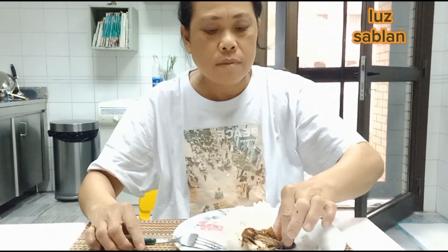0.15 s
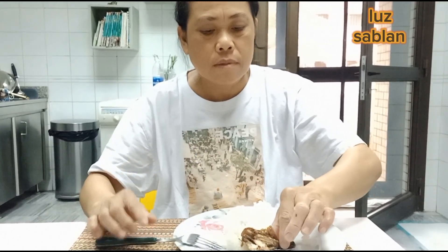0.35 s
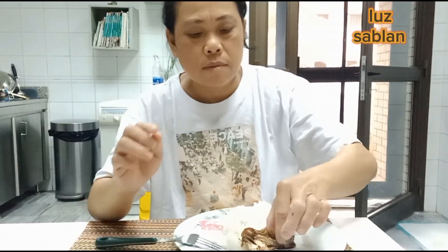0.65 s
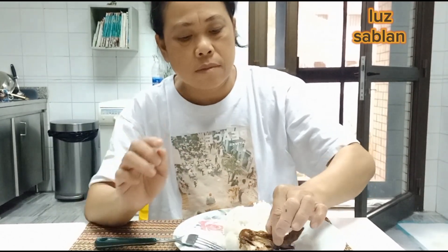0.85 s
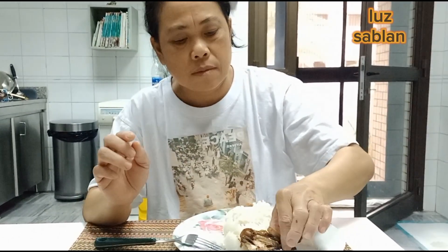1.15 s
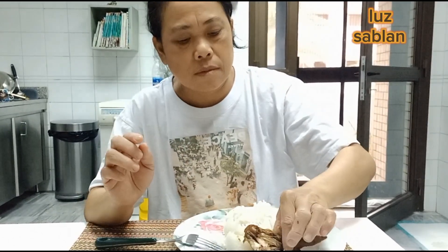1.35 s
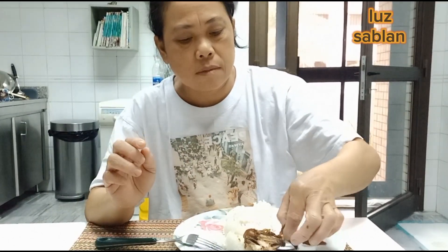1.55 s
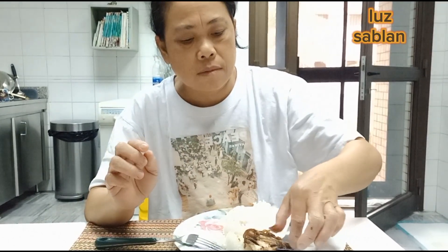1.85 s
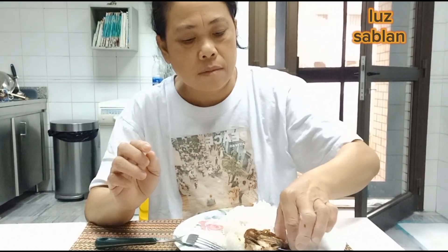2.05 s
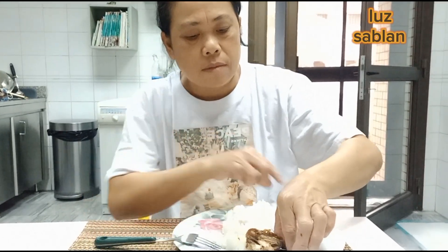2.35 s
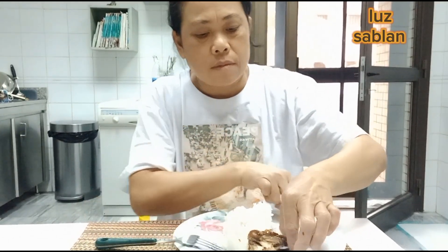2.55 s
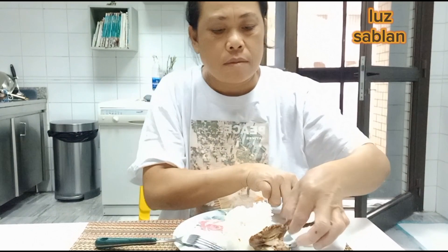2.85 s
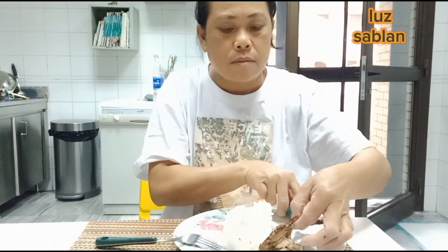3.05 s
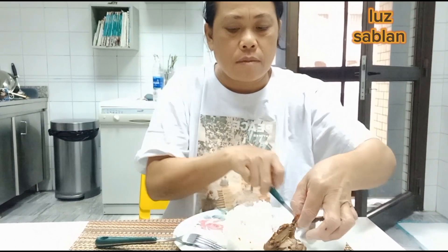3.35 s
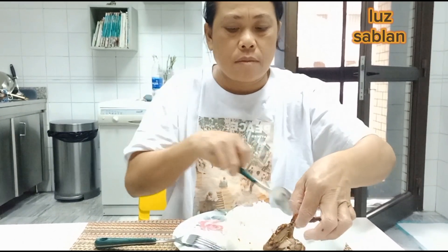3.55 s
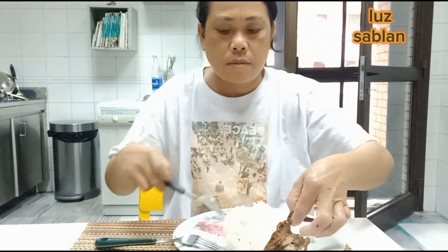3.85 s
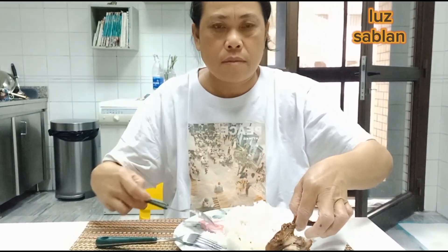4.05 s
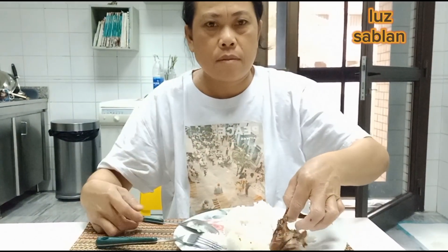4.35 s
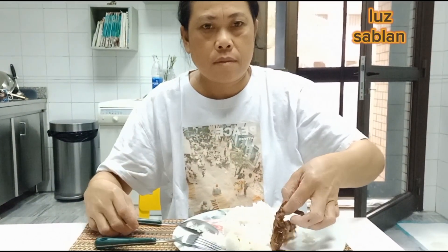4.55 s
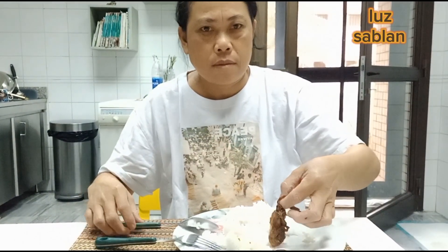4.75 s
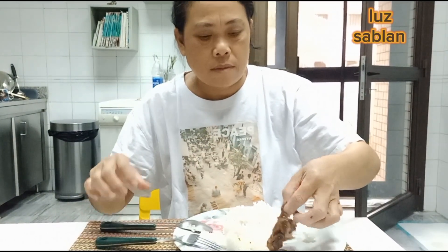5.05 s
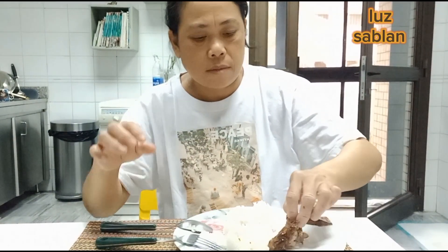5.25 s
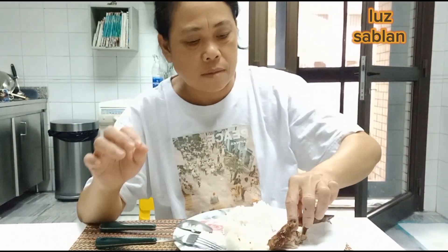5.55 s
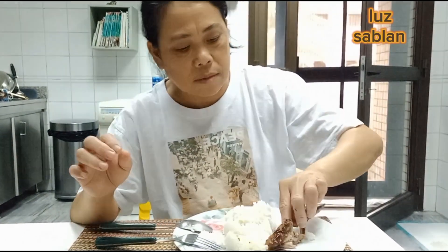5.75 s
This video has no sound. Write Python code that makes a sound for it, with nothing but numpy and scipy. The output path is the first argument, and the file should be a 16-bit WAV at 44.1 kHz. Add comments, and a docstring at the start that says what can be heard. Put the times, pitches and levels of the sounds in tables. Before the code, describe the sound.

Someone cuts food at a table: sparse cutlery clinks, ceramic dings and dull table thuds in a live tiled kitchen.

```python
"""Meal in a tiled kitchen

At the table, a steel knife and fork knock together and rattle, modelled as damped modes plus noise clacks.
Steel taps, scrapes and pings on a ceramic plate; a blade squeaks through meat; the table top thuds.
Fried chicken snaps and crackles in short noise bursts. Hard walls lend each contact a diffuse tail
at two microphones, over the steady rumble of an appliance and a hiss, both shaped noise."""
import sys
import numpy as np
from scipy import signal
from scipy.fft import rfft, irfft, next_fast_len
from scipy.io import wavfile
from scipy.ndimage import uniform_filter1d

SR = 44100
rng = np.random.default_rng(int(sys.argv[2]) if len(sys.argv) > 2 else 0)


def file_out(sig):
    """Save sig as 16-bit WAV at sys.argv[1]."""
    # one column per channel
    cols = np.atleast_2d(sig).T
    # limit, then scale
    lim = np.clip(cols, -1, 1)
    pcm = np.round(lim * 32767).astype(np.int16)
    wavfile.write(sys.argv[1], SR, pcm)


N = 259749  # length of the scene, samples
AGE = np.arange(int(0.75 * SR)) / SR  # time since a contact, s

# knife and fork knock together on the mat and rattle:
# [t/s, knife level/dB, fork level/dB, hardness as cut-off f/Hz, favoured f/Hz of the first contact,
#  favoured f/Hz of the bounces, first flight t/s, loss per bounce/dB]
CLINKS = [(0.001, -46, -53.5, 15000, 1420, 5170, .049, 13),
          (1.070, -44, -28, 11500, 3030, 2370, .0132, 3.5),
          (1.376, -52, -34.5, 7800, 3290, 5050, .022, 7.5), (2.606, -59, -55, 2100, 1600, 1590, .015, 20),
          (4.146, -32.5, -45.5, 17500, 5080, 1330, .0155, 3),
          (4.320, -41.5, -34.5, 14000, 3300, 1536, .02, 9.5),
          (4.760, -43, -51.5, 3820, 2300, 2300, .013, 17), (4.779, -32, -24, 14100, 2930, 2096, .0085, 1.5),
          (4.895, -38, -33, 9400, 1655, 2215, .011, 8.5)]


def amp(db):
    """Decibels to gain."""
    return 10 ** (np.asarray(db) / 20)


def unit(x):
    """Scale x to rms 1."""
    return x / np.sqrt(np.mean(x ** 2) + 1e-30)


def along(points, hz):
    """Read (Hz, value) points by interpolation on a log frequency axis."""
    f, v = np.transpose(points)
    return np.interp(np.log(hz + 1), np.log(f + 1), v)


def filtered(x, response):
    """Multiply the spectrum of x by a gain that depends on frequency."""
    n = x.shape[-1]
    m = next_fast_len(n + 4096)  # zero padding leaves room for the filter to ring out
    return irfft(rfft(x, m) * response(np.fft.rfftfreq(m, 1 / SR)), m)[..., :n]


def noise(spectrum, shape):
    """Noise of rms 1 with a given spectrum."""
    white = rng.standard_normal(shape)
    return unit(filtered(white, lambda hz: amp(along(spectrum, hz))))


def fade(t60, t=AGE):
    """Exponential decay, 60 dB down after t60 seconds."""
    return np.exp(-np.log(1000) * t / np.maximum(t60, 1e-4))


def gate(start, end, attack_s, release_s):
    """An envelope that rises from start, holds until end and falls away."""
    t = np.arange(N) / SR
    return np.clip((t - start) / attack_s, 0, 1) * np.clip(1 - (t - end) / release_s, 0, 1)


def curves(rows):
    """One value per sample for each column after the time."""
    s, *columns = np.transpose(rows)
    return [np.interp(np.arange(N) / SR, s, column) for column in columns]


def add(track, s, sound):
    """Mix a sound into the track at time s."""
    part = track[:, max(0, round(s * SR)):][:, :sound.shape[-1]]
    part += sound[:, :part.shape[-1]]


def kitchen(direct_db, lag=0):
    """Response from a spot on the table to two microphones: direct sound (right later by lag s), diffuse tail."""
    # how long the tiled room rings: [f/Hz, t60/s]
    room_decay = [(150, 0.35), (1500, 0.45), (4000, 0.44), (8000, 0.41), (15000, 0.27)]
    hz, t, z = signal.stft(rng.standard_normal((2, len(AGE))), SR, nperseg=256)
    decaying = z * fade(along(room_decay, hz)[:, None], t)
    tail = signal.istft(decaying, SR, nperseg=256)[1]
    # a diffuse field carries about equal energy in every narrow band
    z = rfft(tail, 2 * len(AGE))
    power = uniform_filter1d(np.abs(z) ** 2, size=45)
    response = irfft(z / np.sqrt(np.abs(power) + 1e-12))[:, :len(AGE)]
    response[[0, 1], [0, round(abs(lag) * SR)]] += amp(direct_db)
    return response


def heard(sound, room):
    """A contact sounding in the room, at rms 1 over its first 50 ms."""
    wet = signal.fftconvolve(sound[None], room, axes=1)[:, :len(AGE)]
    return wet / np.sqrt(np.mean(wet[:, :SR // 20] ** 2) + 1e-30)


def contact(hz, cutoff_hz):
    """A longer, softer contact passes fewer high frequencies."""
    return 1 / np.sqrt(1 + (hz / cutoff_hz) ** 4)


def body(modes):
    """The frequencies and free vibrations of an object's modes."""
    hz, db, t60 = np.transpose(modes)[:, :, None]
    return hz[:, 0], amp(db) * fade(t60) * np.exp(2j * np.pi * hz * AGE)


def strike(obj, cutoff_hz, favoured_hz, favour_db=9.0, octaves=0.077, scatter_db=0.6):
    """A blow rings all modes, most of all those with an antinode at the point of contact."""
    hz, rings = obj
    antinode_db = favour_db * np.exp(-(np.log2(hz / favoured_hz) / octaves) ** 2)
    scatter = scatter_db * rng.standard_normal(len(hz))
    size = contact(hz, cutoff_hz) * amp(antinode_db + scatter)
    phase = np.exp(2j * np.pi * rng.random(len(hz)))
    return unit(((size * phase) @ rings).real)


def burst(spectrum, t60, cutoff_hz):
    """The short unpitched noise of a contact, duller when the contact is soft."""
    softened = filtered(noise(spectrum, len(AGE)), lambda hz: contact(hz, cutoff_hz))
    return unit(softened * fade(t60))


def puff(centre_hz, octaves, t60):
    """A dying burst of noise in one band."""
    band = lambda hz: 1 / (1 + (np.log2((hz + 1) / centre_hz) / octaves) ** 2 / 2) ** 2
    return filtered(rng.standard_normal(len(AGE)), band) * fade(t60)


def slips(count, spread_db=5):
    """Stick-slip friction: a dense run of tiny jerks of very unequal size."""
    spread = rng.standard_normal(count // 64 + 1)
    sizes = amp(spread_db * np.repeat(spread, 64)[:count])  # a new size every 64 samples
    return unit(rng.standard_normal(count) * sizes)


def ambience(spectrum):
    """Steady room noise, alike on both sides in the bass and diffuse above."""
    # likeness of the left and right microphones: [f/Hz, correlation]
    likeness = [(100, .97), (200, 0.97), (350, 0.67), (600, 0.28), (2000, 0.062), (12000, .02)]
    turn = lambda hz: np.arccos(np.clip(along(likeness, hz), -1, 1)) / 2
    mid_side = lambda hz: np.array([np.cos(turn(hz)), np.sin(turn(hz))])
    mid, side = filtered(noise(spectrum, (2, N)), mid_side)
    return unit(np.array([mid + side, mid - side]))


def bounces(s, flight_s, loss_db, count):
    """Time and relative dB of each contact of a rattle: ever sooner and weaker."""
    k = np.arange(count)
    flights = flight_s * 0.85 ** k  # each flight is shorter than the one before
    return zip(s + np.cumsum(flights) - flights, -loss_db * k)


def cutlery():
    """Knife and fork ring and clack against each other, then bounce on another point of contact."""
    # modes damped by hand, mat and food: [f/Hz, relative level/dB, t60/s]
    knife_modes = [(655, -19, 0.14), (1420, -11.5, 0.16), (1565, -11.5, 0.13), (1960, -11.5, 0.0367),
                   (2220, -8, 0.15), (2366, -4.5, 0.13), (2950, -13, .035), (3240, -11, .015),
                   (3486, -6.5, 0.021), (3953, -14.5, .05), (4230, -16, 0.027), (5097, -11.5, 0.17),
                   (6270, -16, 0.044), (6250, -22.5, 0.14), (6565, -14.5, 0.14), (8530, -3, 0.024),
                   (8090, 1, 0.011), (9900, -12.5, 0.023), (10240, -19, 0.053), (10800, -6, 0.03),
                   (11920, -3, 0.03), (12540, -14, 0.018), (13230, -1, 0.024), (14050, -14.5, 0.021),
                   (14600, -22.5, .04), (14700, -3, 0.0171), (15500, -29, .03)]
    fork_modes = [(1429, -17, 0.18), (1598, -12.5, 0.1), (1925, -9.5, 0.042), (2197, -6, 0.11),
                  (2400, -7, 0.02), (3036, -6, 0.099), (3127, 1.5, 0.015), (3400, -4.5, 0.019),
                  (3525, -8, 0.081), (3900, -14.5, .08), (3873, -9, 0.069), (4560, -5, 0.028),
                  (4660, -15.5, 0.23), (5100, -11.5, 0.065), (5650, -14, 0.085), (6160, -16.5, 0.037),
                  (6670, -14.5, 0.11), (7700, -13.5, 0.11), (8030, -10, 0.022), (8890, -17, 0.0586),
                  (9800, -23.5, 0.077), (10000, -12.5, 0.12), (10340, -25.5, .04), (11660, -15.5, 0.047),
                  (11940, -26, .07), (12720, -17, .025), (13570, -20, .018), (14460, -26, .02)]
    # unpitched clack of steel on steel: [f/Hz, relative level/dB per Hz]
    clack = [(300, -37), (1000, -15), (1500, 3.5), (2300, -6), (3300, 13.5), (4800, 6.5), (7200, -24.5),
             (10000, -26.5), (14000, -25), (16500, -30)]
    out, knife, fork = np.zeros((2, N)), body(knife_modes), body(fork_modes)
    for start, knife_db, fork_db, cutoff_hz, first_hz, bounce_hz, flight_s, loss_db in CLINKS:
        for k, (s, db) in enumerate(bounces(start, flight_s, loss_db, count=4)):
            room = kitchen(direct_db=-6.5)
            favoured_hz = bounce_hz if k else first_hz
            blade = strike(knife, cutoff_hz, favoured_hz)
            blade = blade + amp(-15) * burst(clack, t60=0.029, cutoff_hz=cutoff_hz)
            tines = strike(fork, cutoff_hz, favoured_hz)
            tines = tines + amp(-14.5) * burst(clack, t60=0.084, cutoff_hz=cutoff_hz)
            both = amp(knife_db + db) * heard(blade, room) + amp(fork_db + db) * heard(tines, room)
            add(out, s, both)
    return out


def table():
    """The table top answers hands and cutlery with a dull thud, stronger under a louder clink."""
    # a hand bumps the table: [t/s, level/dB, centre f/Hz]
    thuds = [(0.022, -45, 158), (0.657, -43, 164), (1.107, -48.5, 312), (1.495, -50, 300),
             (2.235, -52.5, 380), (2.605, -52, 333), (3.030, -47.5, 170), (4.759, -38.5, 210)]
    # knock of the table top under each clink: [f/Hz, relative level/dB per Hz]
    top_spectrum = [(20, -69.5), (50, -30), (100, -1.5), (135, 4), (180, -9), (250, -3), (360, -7.5),
                    (480, -23.5), (700, -30.5), (1200, -37.5), (3000, -72)]
    knock_db, knock_growth = -35.5, 0.3  # knock under a 0 dB contact; dB of knock per dB of contact
    out = np.zeros((2, N))
    for s, db, centre_hz in thuds:
        thud = puff(centre_hz, octaves=0.59, t60=0.31)
        add(out, s, amp(db) * heard(thud, kitchen(direct_db=5.0)))
    for s, knife_db, fork_db, *_ in CLINKS:
        knock = noise(top_spectrum, len(AGE)) * fade(t60=0.33)
        level = amp(knock_db + knock_growth * max(knife_db, fork_db))
        add(out, s, level * heard(knock, kitchen(direct_db=9.5)))
    return out


def crackles(count):
    """Crisp skin tears as a few tiny snaps, unevenly spread over the length of each tear."""
    # runs of crackles: [start t/s, length t/s, mean level/dB, centre f/Hz]
    tears = [(2.032, .1, -70.5, 8800), (2.812, 0.097, -71, 7860), (3.186, 0.036, -68.5, 11600)]
    octaves, life_s, scatter_db = 0.26, 0.0037, 4
    for start, length, db, centre_hz in tears:
        for share in (np.arange(count) + rng.random(count)) / count:
            level_db = db + scatter_db * rng.standard_normal()
            yield start + share * length, level_db, centre_hz, octaves, life_s


def chicken():
    """Gristle, bone and skin snap: each a brief burst in its own band, close to the microphones."""
    # gristle and bone: [t/s, level/dB, centre f/Hz, width/octaves, t60/s]
    snaps = [(0.009, -53.5, 12100, 3.7, 0.028), (0.156, -66, 4940, 0.82, 0.07),
             (0.339, -77, 9000, .7, .006), (0.624, -58, 11000, 1.1, 0.017),
             (0.823, -42.5, 12000, 3.3, 0.015), (1.615, -64, 4900, 0.21, 0.0079),
             (3.950, -67, 3600, 0.86, 0.055), (5.446, -72.5, 5330, .2, 0.016)]
    out = np.zeros((2, N))
    for s, db, centre_hz, octaves, life in [*snaps, *crackles(count=3)]:
        add(out, s, amp(db) * heard(puff(centre_hz, octaves, life), kitchen(direct_db=0.5)))
    return out


def plate():
    """Taps ring the plate, which the food damps; dragging steel keeps it ringing with tiny slips."""
    # modes of the ceramic, damped by food: [f/Hz, relative level/dB, t60/s]
    plate_modes = [(1142, -1.5, 0.061), (1713, -4, 0.01), (2599, -1, 0.13), (3551, -9.5, 0.095),
                   (4210, -5.5, 0.073), (4350, -8, 0.081), (4560, 0, 0.033), (4840, -10, 0.12),
                   (5090, -10.5, 0.077), (5744, -7, 0.065), (6140, -9, 0.048), (7690, -25, .04),
                   (8190, -7, 0.046), (10030, -14, 0.029), (11140, -6.5, 0.032), (13400, -5, 0.06),
                   (14230, -38, .02), (14815, -31, .02)]
    # unpitched click of steel on ceramic: [f/Hz, relative level/dB per Hz]
    click_spectrum = [(300, 5), (900, -1), (1800, 12.5), (4500, -6), (7000, -5), (10000, -7.5),
                      (13000, 3.5), (16500, -8)]
    # taps: [t/s, ring level/dB, hardness as cut-off f/Hz, favoured f/Hz, click level/dB, left minus right/dB]
    taps = [(0.647, -49.5, 16000, 6070, -60, 12), (3.027, -29, 13200, 3660, -36.5, 4),
            (3.164, -40.5, 4600, 2580, -51, -3), (3.366, -49, 7200, 2580, -81, 4.5),
            (3.424, -53.5, 14800, 3550, -54, 1), (5.231, -47.5, 7100, 2580, -66, 0.5)]
    # scrapes: [start t/s, length t/s, level at the start/dB, hardness as cut-off f/Hz, favoured f/Hz,
    #           grit relative to the ring/dB]
    scrapes = [(0.625, .085, -37.5, 15000, 1130, -16.5), (0.71, 0.026, -43.5, 9000, 3550, -4),
               (2.182, .18, -48, 15000, 3500, 1), (3.060, 0.29, -65, 10000, 2580, 17)]
    # light grazes that leave only a thin high ping: [t/s, level/dB]
    pings = [(0.157, -60), (0.823, -45.5)]
    attack_s, release_s, sag_db = 0.021, 0.017, 5  # a stroke bites, eases off along its length and lifts
    lag_s = 0.00036  # direct sound reaches the right microphone this much later
    out, dish, t = np.zeros((2, N)), body(plate_modes), np.arange(N) / SR
    for s, ring_db, cutoff_hz, favoured_hz, click_db, pan_db in taps:
        room = kitchen(direct_db=-0.5, lag=lag_s)
        ring = amp(ring_db) * heard(strike(dish, cutoff_hz, favoured_hz, favour_db=8.5), room)
        click = amp(click_db) * heard(burst(click_spectrum, t60=0.015, cutoff_hz=cutoff_hz), room)
        add(out, s, (ring + click) * amp([[pan_db / 2], [-pan_db / 2]]))
    for s, length, db, cutoff_hz, favoured_hz, grit_db in scrapes:
        ring = strike(dish, cutoff_hz, favoured_hz, favour_db=16.0)
        grit = amp(grit_db) * burst(click_spectrum, t60=0.018, cutoff_hz=cutoff_hz)
        answer = heard(ring + grit, kitchen(direct_db=-2.5, lag=lag_s))  # of plate and room to one slip
        pressure = amp(db - sag_db * np.clip((t - s) / length, 0, 1))
        stroke = pressure * gate(s, s + length, attack_s, release_s) * slips(N)
        out += signal.fftconvolve(stroke[None], answer / np.linalg.norm(answer[0]), axes=1)[:, :N]
    for s, db in pings:
        ping = puff(centre_hz=12800, octaves=0.018, t60=0.068)
        add(out, s, amp(db) * heard(ping, kitchen(direct_db=3)))
    return out


def cutting():
    """The blade rubs through the meat: friction noise modulates a soft, wandering squeak."""
    # the slide of the knife: [t/s, level before the gain below/dB, squeak f/Hz]
    slide = [(2.45, -80, 1770), (2.512, -65, 1982), (2.6, -61, 1570), (2.606, -48, 1600), (2.67, -70, 1530),
             (2.844, -73.5, 1923), (2.956, -63.5, 2040), (3.02, -53, 1580)]
    gain_db, fade_s = 2, 0.035
    db, squeak_hz = curves(slide)
    stroke = amp(db + gain_db) * gate(slide[0][0], slide[-1][0], fade_s, fade_s)
    dull = lambda hz: 1 / np.sqrt(1 + (hz / 110) ** 2) * contact(hz, 2700)
    flutter = unit(filtered(slips(N, spread_db=1), dull))
    squeak = np.sin(2 * np.pi * np.cumsum(squeak_hz) / SR)
    rub = stroke * unit(flutter * squeak)
    room = kitchen(direct_db=-2.5)
    return signal.fftconvolve(rub[None], room / np.linalg.norm(room[0]), axes=1)[:, :N]


def scene():
    """The meal over the rumble and hiss of the kitchen."""
    # low rumble of an appliance in the background: [f/Hz, relative level/dB per Hz]
    rumble = [(15, -75.5), (25, -43.5), (43, -22), (58, -17), (76, 1), (107, -10.5), (141, -2.5), (172, -9),
              (295, -7), (396, -15), (428, -17), (548, -17), (669, -22), (818, -20.5), (1000, -25.5),
              (1300, -56), (2200, -120)]
    # hiss above it: [f/Hz, relative level/dB per Hz]
    hiss = [(590, -24), (1000, -4), (1420, -5), (1610, -9), (1980, -10), (2280, -19), (3010, -16.5),
            (4020, -15.5), (5500, -27.5), (8650, -21.5), (16000, -22.5)]
    background = amp(-49.5) * ambience(rumble) + amp(-65) * ambience(hiss)
    return cutlery() + table() + chicken() + plate() + cutting() + background


def record(dry):
    """The phone cuts off very steeply above its band limit."""
    top_hz = 15750
    return filtered(dry, lambda hz: 1 / np.sqrt(1 + (hz / top_hz) ** 120))


dry = scene()
out = record(dry)
file_out(out)
```